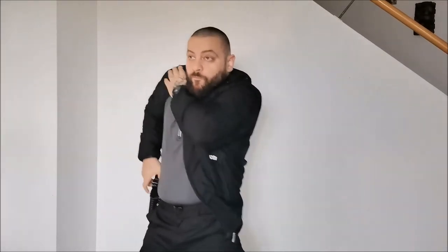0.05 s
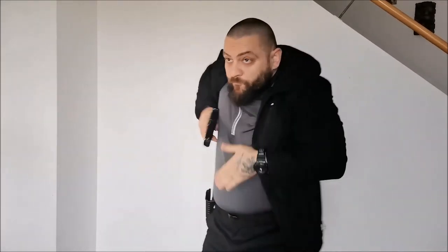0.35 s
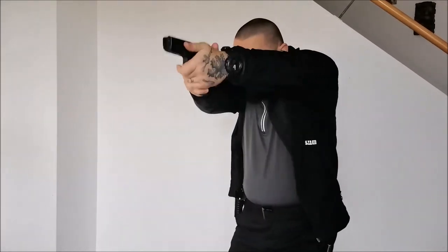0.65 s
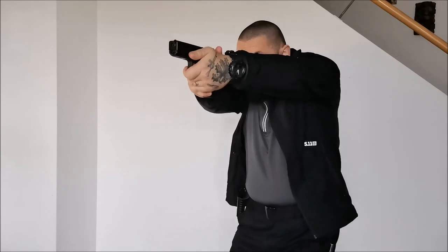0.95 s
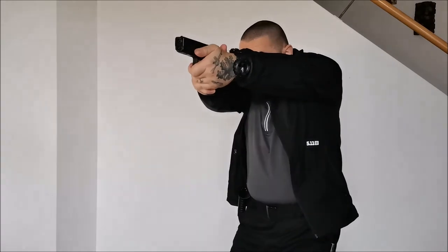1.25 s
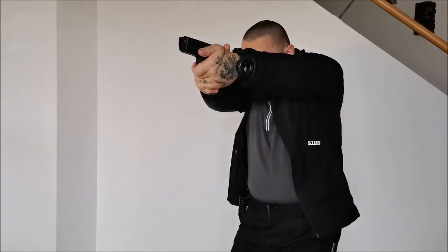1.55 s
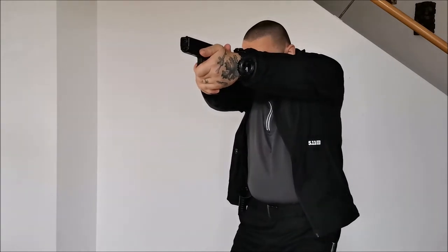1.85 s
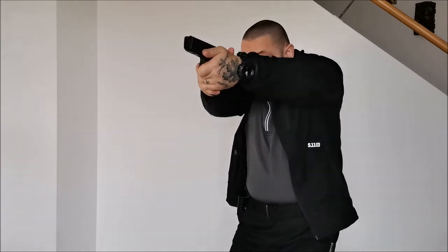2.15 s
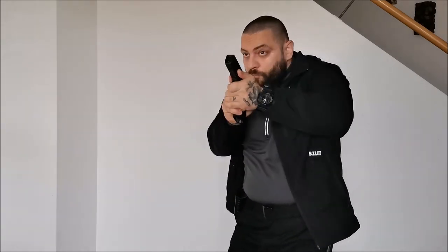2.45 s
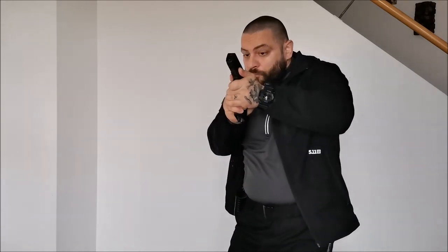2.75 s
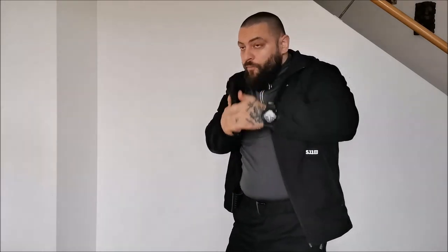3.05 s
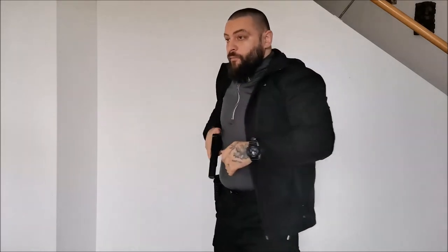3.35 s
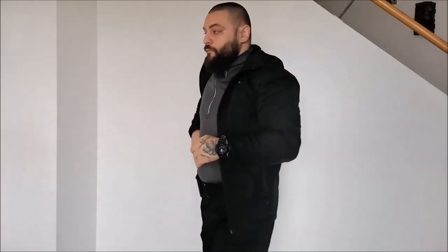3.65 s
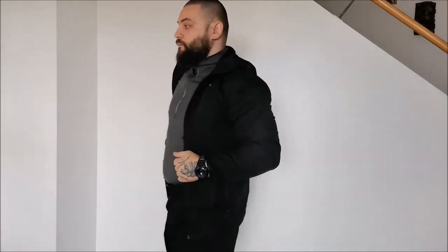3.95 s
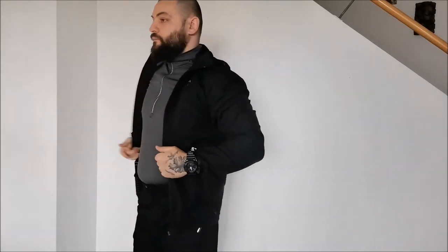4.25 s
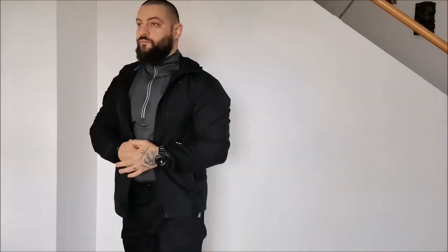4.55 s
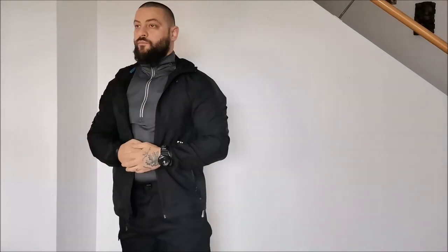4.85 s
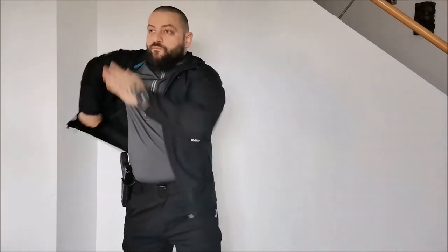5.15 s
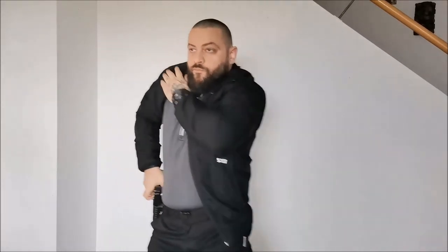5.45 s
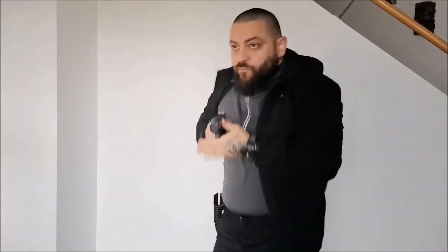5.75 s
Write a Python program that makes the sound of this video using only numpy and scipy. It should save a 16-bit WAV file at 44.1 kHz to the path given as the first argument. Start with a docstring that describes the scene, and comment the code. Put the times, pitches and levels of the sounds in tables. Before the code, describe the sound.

In a quiet, bare room, heard in stereo from a few steps away, stiff jacket fabric rustles and a pistol slide scrapes and clicks. A lull follows, with only room air and one small click. Then come hollow plastic knocks as the pistol is holstered, some rubbing and flapping of cloth, and a fast second draw with a loud flap, dull thuds and ringing metal clicks.

```python
"""Pistol-drawing practice: a man in a shell jacket, a few steps from a stereo microphone in a bare room.
He sweeps the jacket aside, draws, works the slide, aims, reholsters, lets the jacket fall and draws again.
Steel clicks and rings, the plastic holster knocks, cloth rubs and flaps, feet or body thud, walls answer.
Behind him the house is quiet: room air, a faint whine, far chirps. Quick moves puff air at the microphone."""
import sys
import numpy as np
from scipy import signal
from scipy.fft import rfft, irfft, next_fast_len
from scipy.io import wavfile

SR = 44100
rng = np.random.default_rng(int(sys.argv[2]) if len(sys.argv) > 2 else 0)


def log_audio(samples):
    """Write samples as a 16-bit WAV file to the path given in sys.argv[1]."""
    # one column per channel
    frames = np.atleast_2d(samples).T
    # limit to full scale, then quantise
    limited = np.clip(frames, -1, 1)
    pcm = np.round(limited * 32767).astype(np.int16)
    wavfile.write(sys.argv[1], SR, pcm)


N = 264159
TIME = np.arange(N) / SR


def from_db(db):
    """Decibels to gain."""
    return 10 ** (np.asarray(db) / 20)


def rms_one(x):
    """Scale to rms 1."""
    return x / np.sqrt(np.mean(x ** 2) + 1e-30)


def energy_one(x):
    """Scale to an average energy of 1 per channel."""
    return rms_one(x) / np.sqrt(x.shape[-1])


def at_hz(points, hz):
    """Read a table on a log-frequency axis."""
    known_hz, values = np.transpose(points)
    return np.interp(np.log(np.maximum(hz, 1)), np.log(known_hz), values)


def response(spectrum, tilt_db=0, size=4096):
    """Minimum-phase impulse response of a colour, tilted by tilt_db per octave about 1 kHz."""
    hz = np.fft.rfftfreq(size, 1 / SR)
    octaves = np.log2(np.maximum(hz, 200) / 1000)
    cepstrum = irfft(np.log(from_db(at_hz(spectrum, hz) + tilt_db * octaves)))
    cepstrum[1:size // 2] *= 2
    cepstrum[size // 2 + 1:] = 0
    return irfft(np.exp(rfft(cepstrum)))


def through(x, impulse):
    """Convolve along time, keeping the length."""
    return signal.oaconvolve(np.atleast_2d(x), np.atleast_2d(impulse), axes=-1)[:, :x.shape[-1]]


def add(track, s, sound):
    """Mix a sound into a track at second s."""
    start = max(0, round(s * SR))
    part = sound[:len(track) - start]
    track[start:start + len(part)] += part


def drift(turns_per_s):
    """A random wander with a spread near 1."""
    knots = rng.standard_normal(4096)
    return np.interp(TIME * turns_per_s, np.arange(len(knots)), knots)


def swell(s, half_s):
    """A smooth rise and fall around a moment."""
    return np.exp(-((TIME - s) / half_s) ** 2)


def held(s, hold_s, rise_db_per_s, fall_db_per_s):
    """An envelope that rises to 1 at a moment, holds and falls away."""
    before_s, after_s = np.maximum(s - TIME, 0), np.maximum(TIME - s - hold_s, 0)
    return from_db(-rise_db_per_s * before_s - fall_db_per_s * after_s)


def burst(noise, envelope):
    """Enveloped noise, whitened so that only the body it excites gives it colour."""
    spectrum = rfft(noise * envelope)
    return irfft(spectrum / (np.abs(spectrum) + 1e-12)) * np.sqrt(envelope)


def diffuse(pair, shared=0.64, spacing_m=0.14, sound_m_per_s=343):
    """Sound from all sides: the two microphone ports hear waves longer than their spacing much alike."""
    size = next_fast_len(pair.shape[-1], True)
    mid, side = rfft(pair, size)
    alike = shared * np.sinc(2 * np.fft.rfftfreq(size, 1 / SR) * spacing_m / sound_m_per_s)
    mid, side = mid * np.sqrt(1 + alike), side * np.sqrt(1 - alike)
    return irfft(np.array([mid + side, mid - side]), size)[:, :pair.shape[-1]]


def steady_noise(spectrum):
    """Smooth diffuse noise of one colour."""
    return rms_one(through(diffuse(rng.standard_normal((2, N))), response(spectrum, size=16384)))


def tone(hz, waver_hz):
    """A sine of rms 1 whose pitch wanders a little."""
    return np.sqrt(2) * np.sin(2 * np.pi * np.cumsum(hz + waver_hz * drift(9.7)) / SR)


def house_whine(hz=661, gain_db=-2, waver_db=1):
    """A faint, wavering whine comes and goes somewhere in the house."""
    # Each row: arrival at full level in seconds, hold in seconds, relative level in dB.
    whines = [(1.07, .27, -80), (1.62, 0.34, -81), (2.112, 0.074, -62), (2.373, .06, -66),
              (2.585, 0.44, -73.5)]
    spells = [from_db(db) * held(s, hold_s, rise_db_per_s=148, fall_db_per_s=130)
              for s, hold_s, db in whines]
    return np.max(spells, axis=0) * from_db(gain_db - waver_db * drift(19)) * tone(hz, waver_hz=2.05)


def far_chirps():
    """Faint high chirps, a long way off."""
    # Each row: peak in seconds, half length in seconds, level in dB, pitch in Hz.
    chirps = [(1.505, .045, -86, 3550), (2.001, 0.054, -85.5, 3510), (2.988, .05, -82, 3510)]
    return sum(from_db(db) * swell(s, half_s) * tone(hz, waver_hz=26.8) for s, half_s, db, hz in chirps)


def room_air(ambience_db=-64.5, draught_db=-66.5):
    """Room tone, a low draught, and the puffs that quick movements push at the microphone."""
    # Colours of the room tone and of moving air. Each row: frequency in Hz, relative level in dB.
    ambience = [(15, 0), (50, -3.5), (100, -6.5), (230, -10), (450, -20), (800, -16), (1400, -25),
                (3500, -29.5), (8000, -43), (15000, -34)]
    air = [(10, -3.5), (25, -8), (38, -6.5), (60, -25.5), (150, -29), (500, -94)]
    # Each row: peak in seconds, half length in seconds, level in dB.
    puffs = [(0.308, 0.049, -38.5), (0.4, 0.043, -48), (.84, 0.036, -59), (1.012, 0.026, -53),
             (3.945, 0.027, -46.5), (5.602, 0.07, -41.5), (5.757, .05, -45)]
    draught = from_db(draught_db) + sum(from_db(db) * swell(s, half_s) for s, half_s, db in puffs)
    return from_db(ambience_db) * steady_noise(ambience) + draught * steady_noise(air)


def direct(x, lead_s):
    """The straight path reaches the left port a moment before the right."""
    return np.array([x, np.interp(TIME - lead_s, TIME, x)])


def room(x, lead_s, early_db, late_db, early_s=0.031, first_echo_s=0.0028, build_s=0.0063, size=32768):
    """Direct sound, a cluster of reflections off the near walls, and a tail longest in the low mids."""
    # Each row: frequency in Hz, time to fall 60 dB in seconds.
    room_t60 = [(100, 0.41), (500, 0.73), (1500, 0.54), (4000, 0.38), (8000, 0.49), (15000, 0.57)]
    t, hz = TIME[:size], np.fft.rfftfreq(size, 1 / SR)
    near, far = rng.standard_normal((2, 2, size))
    far_spectrum = rfft(far)
    centres = np.geomspace(100, 16000, 8)
    tail = 0
    for centre, share in zip(centres, np.eye(len(centres))):
        band = irfft(far_spectrum * at_hz(np.column_stack([centres, share]), hz))
        tail = tail + band * np.exp(-np.log(1000) * t / at_hz(room_t60, centre))
    arrived = np.clip(t / first_echo_s - 1, 0, 1)
    reflections = near * from_db(7.2 * rng.standard_normal(size))
    early = energy_one(diffuse(burst(reflections, arrived * np.exp(-t / early_s))))
    late = energy_one(diffuse(tail * arrived * (1 - np.exp(-t / build_s))))
    return direct(x, lead_s) + through(x, from_db(early_db) * early + from_db(late_db) * late)


def standing_waves(x):
    """The room's low modes boom on after a thud."""
    # Each row: frequency in Hz, relative level in dB, time to fall 60 dB in seconds.
    room_modes = [(102.3, 3.5, 0.34), (163, 2, .22), (244, -4, 0.3), (274.6, -5, 0.26), (343.7, 4, 0.25),
                  (546, 3.5, 0.16), (833, -0.5, 0.12)]
    out = np.zeros(N)
    for hz, db, t60 in room_modes:
        q = np.pi * hz * t60 / np.log(1000)
        out += from_db(db) * signal.lfilter(*signal.iirpeak(hz, q, fs=SR), x)
    return out


def rubbing(spectrum, uneven_db, grains_per_s, grain_db):
    """Cloth friction: smooth sliding plus tiny slips of the weave, which bunch up as folds catch."""
    grip = from_db(uneven_db * drift(70))
    slipping = rng.random(N) < grains_per_s * grip / SR
    slips = slipping * from_db(8.1 * np.minimum(rng.exponential(1, N), 3))
    slide, snap = rng.standard_normal((2, 2, N))
    force = grip * slide + from_db(grain_db) * rms_one(slips * snap)
    return rms_one(through(diffuse(force), response(spectrum)))


def jacket_motion(swish_share_of_bulk=0.66):
    """Each movement drives four cloth envelopes: bulky ones billow and swish more, crisp ones hiss more."""
    # Each row: arrival at full speed and hold in seconds, then level, bulk and crispness in relative dB.
    moves = [(0.0, 0.032, -48, 1, -4.5), (0.132, 0.029, -59.5, 0.5, -17), (0.381, 0.082, -49, -23, -2.5),
             (0.591, 0.091, -52, -12, -3), (1.25, .08, -77.5, -7, -8), (2.262, .17, -60, -20, 0.5),
             (2.624, 0.45, -91, 17, -9), (3.137, 0.062, -61.5, -13.5, 1), (3.254, 0.16, -54.5, -8.5, -4),
             (3.46, 0.12, -60.5, -16, -3), (3.773, 0.034, -51.5, -5.5, -8), (3.995, 0.033, -67.5, -3, -3.5),
             (4.13, 0.027, -69.5, 9.5, 3.5), (4.27, 0.031, -65.5, -4, -3.5), (4.35, 0.072, -78.5, 22, 12),
             (4.5, 0.013, -51.5, 12, -6), (4.548, 0.066, -52, -0.5, -0.5), (4.782, 0.0066, -66.5, 2, -9),
             (5.178, .03, -48.5, -2.5, 1), (5.327, 0.021, -47.5, 4.5, -7), (5.424, 0.36, -58, -0.5, -3),
             (5.676, .02, -41.5, -9.5, -4.5), (5.794, 0.16, -47, -16, -6.5)]
    power = np.zeros((4, N))
    for s, hold_s, db, bulk_db, crisp_db in moves:
        shares = from_db([[db + bulk_db], [db + swish_share_of_bulk * bulk_db], [db], [db + crisp_db]])
        power += (shares * held(s, hold_s, rise_db_per_s=256, fall_db_per_s=107.5)) ** 2
    return np.sqrt(power)


def jacket(rustle_db=3, hiss_db=-2):
    """Big folds billow, sleeves swish, the stiff surface rustles and its fibres hiss."""
    # Colours of the cloth. Each row: frequency in Hz, relative level in dB.
    folds = [(40, -6), (100, -12), (180, 1), (300, -2), (450, -10), (900, -35.5)]
    sleeves = [(200, -26.5), (450, -2.5), (800, -0.5), (1100, -6), (1600, -10.5), (3000, -37.5)]
    surface = [(600, -30.5), (1000, 0), (1400, 2), (2300, 2.5), (3300, -3), (4700, -4), (7000, -20.5),
               (15000, -35)]
    fibres = [(2500, -21), (5000, -4.5), (6500, 4), (9000, 0.5), (15000, -1.5)]
    billow, swish, rustle, hiss = jacket_motion()
    return (billow * rubbing(folds, uneven_db=-0.5, grains_per_s=150, grain_db=0.5)
            + swish * rubbing(sleeves, uneven_db=0, grains_per_s=320, grain_db=-9)
            + from_db(rustle_db) * rustle * rubbing(surface, uneven_db=-1.5, grains_per_s=630, grain_db=-15)
            + from_db(hiss_db) * hiss * rubbing(fibres, uneven_db=1.5, grains_per_s=470, grain_db=-10))


def contact(length_s, grit_db, rise, size=8192):
    """One touch: uneven micro-impacts that build over a share (rise) of its length and die fast."""
    force, roughness = rng.standard_normal((2, size))
    age = TIME[:size] / length_s
    envelope = np.exp(-age) * (1 - np.exp(-age / rise))
    return burst(force * from_db(grit_db * np.clip(roughness, -2, 2)), np.sqrt(envelope))


def blow(spectrum, length_s, tilt_db, grit_db, rise):
    """A contact heard through the colour of the thing that is hit; energy 1."""
    return energy_one(through(contact(length_s, grit_db, rise), response(spectrum, tilt_db))[0])


def ringing(modes, size=8192):
    """Decaying modes, struck a little differently each time; energy 1."""
    hz, level_db, t60 = np.transpose(modes)[:, :, None]
    strength = from_db(level_db + rng.normal(0, 1.7, hz.shape)) * rng.choice([-1, 1], hz.shape)
    t = TIME[:size]
    partials = strength * np.sin(2 * np.pi * hz * t) * np.exp(-np.log(1000) * t / t60)
    return energy_one(np.sum(partials, axis=0))


def flaps_and_thuds(gain_db=25):
    """Cloth flaps, plus a few soft, dull thuds of feet or body."""
    # Each row: start in seconds, relative level in dB, length in seconds, tilt in dB per octave.
    soft_hits = [(.35, -51, 0.014, -14), (.565, -60.5, 0.011, -9), (2.825, -62, 0.015, -8),
                 (3.135, -61, 0.0053, -18), (4.125, -51, 0.025, 4), (4.324, -45.5, 0.027, -2.5),
                 (4.385, -42.5, 0.0059, -4), (4.443, -44, 0.0026, -6.5), (4.484, -38, 0.0032, 1),
                 (4.504, -36, 0.0045, -0.5), (5.174, -42, 0.011, 0.5), (5.193, -27.5, 0.0082, 1.5),
                 (5.209, -23, 0.013, 0), (5.228, -31.5, 0.011, -2), (5.25, -33.5, 0.0012, 2),
                 (5.455, -37.5, 0.0074, -22), (5.485, -36, 0.023, -15), (5.527, -45.5, 0.0059, -22.5)]
    # Each row: frequency in Hz, relative level in dB.
    soft_colour = [(35, -19), (65, -13), (100, -6.5), (200, -5), (330, -8), (480, -9), (650, -9.5),
                   (880, -9), (1300, -16.5), (2500, -17), (6000, -35), (15000, -34.5)]
    out = np.zeros(N)
    for s, db, length_s, tilt_db in soft_hits:
        add(out, s, from_db(db + gain_db) * blow(soft_colour, length_s, tilt_db, grit_db=2, rise=0.78))
    return out


def holster(gain_db=23, ring_db=-14):
    """The pistol scrapes and snaps past the holster's catch; the shell gives a short hollow ring."""
    # Each row: start in seconds, relative level in dB, length in seconds, tilt in dB per octave.
    knocks = [(0.35, -49, 0.007, 1.5), (3.621, -39, 0.0073, -5), (3.625, -30, 0.008, 3.5),
              (3.64, -36, 0.0098, 7.5), (3.652, -32, 0.0061, -2), (3.6562, -29, 0.0025, 5),
              (3.726, -34, 0.0043, -0.5), (3.78, -40.5, 0.0059, 3.5), (3.824, -35, 0.014, -0.5),
              (3.861, -39, 0.011, 2), (5.659, -30, 0.0018, 2), (5.666, -31.5, 0.002, -2)]
    # Colour of the plastic. Each row: frequency in Hz, relative level in dB.
    plastic = [(70, -26.5), (200, -10.5), (450, -7.5), (850, 3), (1350, 5.5), (2600, -2), (5000, -18),
               (8000, -29), (15000, -43)]
    # Each row: frequency in Hz, relative level in dB, time to fall 60 dB in seconds.
    shell_modes = [(975, 2, 0.03), (1347, -23.5, 0.12), (1380, 19, 0.022), (2080, 4.5, 0.11),
                   (2800, -18.5, 0.013), (4400, -8, 0.04)]
    out = np.zeros(N)
    for s, db, length_s, tilt_db in knocks:
        knock = blow(plastic, length_s, tilt_db, grit_db=6, rise=0.15)
        add(out, s, from_db(db + gain_db) * (knock + from_db(ring_db) * ringing(shell_modes)))
    return out


def scrapes():
    """Short rubs of steel, grip and cuff: friction noise sings in one resonance while a part travels."""
    # Each row: peak in seconds, half length in seconds, level in dB, pitch in Hz, bandwidth in Hz.
    rubs = [(0.07, 0.067, -57, 1460, 110), (0.194, 0.11, -64, 1670, 1500), (0.354, 0.017, -44.5, 790, 300),
            (0.406, 0.03, -55, 1490, 200), (0.45, 0.016, -43, 1460, 109), (0.497, 0.0098, -37.5, 2200, 160),
            (0.552, 0.013, -46.5, 2880, 300), (1.257, 0.02, -73, 6400, 3500),
            (1.314, 0.016, -74.5, 6500, 4500), (2.168, 0.024, -70, 1630, 220),
            (2.275, 0.019, -61, 2750, 700), (3.224, 0.08, -55.5, 1500, 606), (3.85, 0.023, -59, 1200, 780),
            (4.468, 0.11, -51, 617, 175), (4.67, 0.015, -44.5, 750, 386), (5.665, 0.0093, -32.5, 840, 604),
            (5.891, 0.012, -43, 2850, 130)]
    out = np.zeros(N)
    for s, half_s, db, hz, width_hz in rubs:
        resonance = signal.lfilter(*signal.iirpeak(hz, hz / width_hz, fs=SR), rng.standard_normal(N))
        out += from_db(db) * rms_one(resonance) * swell(s, half_s)
    return out


def pistol(gain_db=21):
    """Sharp steel clicks of the pistol and the jacket's zip; some set the slide ringing."""
    # Each row: start in seconds, relative level in dB, contact length in seconds,
    # tilt in dB per octave, ring against the click in dB.
    clicks = [(0.465, -27.5, 0.0065, 2, -0.5), (0.473, -42, 0.0017, 0.5, 9.5), (0.4885, -35, 0.0039, 0, 3),
              (.499, -39, 0.0024, 5, -11), (0.534, -30.5, 0.0039, 0, -25), (0.651, -44, 0.0019, -3.5, -28),
              (0.674, -46, 0.0012, -5.5, -36), (2.2538, -40.5, 0.00061, 4.5, -32),
              (2.261, -51, 0.0017, 1.5, -35), (3.47, -48, 0.0036, 2.5, -23),
              (3.474, -45.5, 0.0018, -11.5, -28), (4.6223, -34.5, 0.0035, 8, -45),
              (4.764, -38, 0.014, 18, -42), (5.25, -25.5, 0.0021, 9.5, -46), (5.481, -40, 0.0062, -1, -8.5),
              (5.644, -33, 0.0084, -4.5, -17), (5.66, -26, 0.0042, 5.5, -11), (5.757, -30, 0.0087, 1, -6),
              (5.803, -30, 0.0022, 3.5, -12), (5.84, -37, 0.0056, -9, -19),
              (5.8882, -27.5, 0.0018, 1.5, -4), (5.903, -50, 0.0018, 4, 5)]
    # Colour of the steel. Each row: frequency in Hz, relative level in dB.
    steel = [(200, -42), (550, -23), (1000, -9), (1400, -1.5), (2300, 5.5), (3500, -9), (5000, -9),
             (8000, -14), (15000, -18.5)]
    # Each row: frequency in Hz, relative level in dB, time to fall 60 dB in seconds.
    slide_modes = [(1426, 3.5, .1), (2154, 7, 0.1), (2540, -30, .06), (3060, -21, 0.11), (4380, 4.5, 0.028),
                   (4800, -11.5, 0.042), (6000, -8, 0.0694), (8860, -40, 0.032)]
    out = np.zeros(N)
    for s, db, length_s, tilt_db, ring_db in clicks:
        click = blow(steel, length_s, tilt_db, grit_db=4, rise=0.26)
        add(out, s, from_db(db + gain_db) * (click + from_db(ring_db) * ringing(slide_modes)))
    return out


def scene(boom_db=4):
    """A few steps off: pistol in the open, holster screened by the body, jacket facing the microphone."""
    # The man turns between the ports. Each row: time in seconds, left minus right in dB.
    turning = [(0, -3), (.55, -0.5), (3.3, 0.5), (5.25, -0.5), (5.7, -3.5)]
    thuds = flaps_and_thuds()
    man = (room(pistol() + scrapes(), lead_s=0.00003, early_db=0, late_db=-4)
           + room(holster(), lead_s=0.00003, early_db=4.5, late_db=1)
           + room(thuds, lead_s=0.00016, early_db=-3.5, late_db=-6.5)
           + from_db(boom_db) * standing_waves(thuds)
           + jacket())
    pan_db = np.interp(TIME, *np.transpose(turning))
    house = house_whine() + far_chirps() + room_air()
    return man * from_db([pan_db / 2, -pan_db / 2]) + house


def record(dry, cutoff_hz=15900):
    """Recording colour: treble notched near 10-13 kHz, brighter on the left, top cut."""
    # Each row: frequency in Hz, gain in dB.
    left_colour = [(100, 1.5), (2500, 2.5), (6000, 7.5), (9400, 5), (10100, -4.5), (12500, -1.5),
                   (13200, 7.5), (16000, 0.5)]
    right_colour = [(100, -1), (2500, 0), (6000, 3.5), (9400, -3.5), (10100, -10), (12500, -12.5),
                    (13200, -6), (16000, -9)]
    heard = np.vstack([through(x, response(colour)) for x, colour in zip(dry, (left_colour, right_colour))])
    return signal.sosfilt(signal.ellip(10, 0.2, 80, cutoff_hz, fs=SR, output="sos"), heard)


dry = scene()
out = record(dry)
log_audio(out)
```